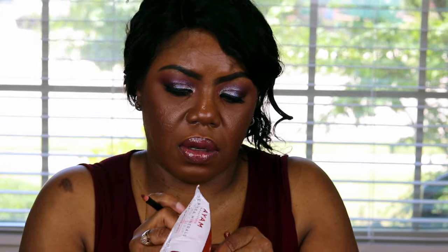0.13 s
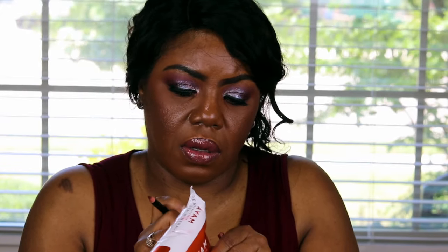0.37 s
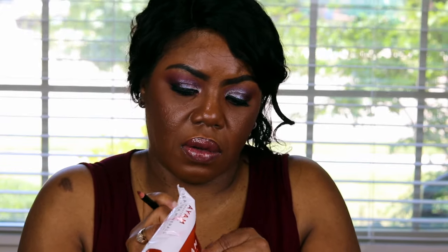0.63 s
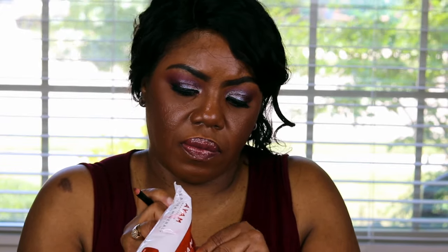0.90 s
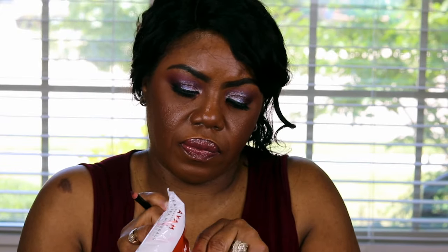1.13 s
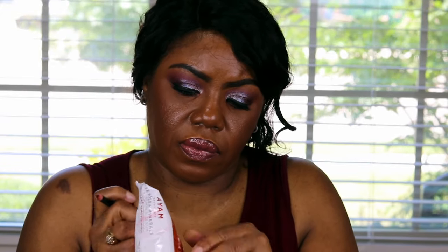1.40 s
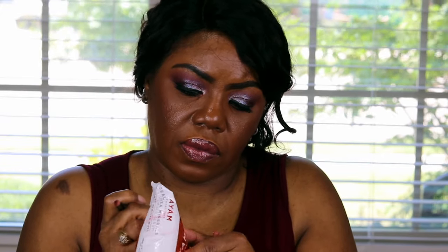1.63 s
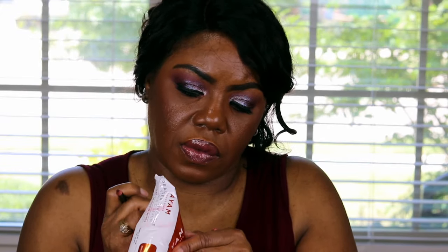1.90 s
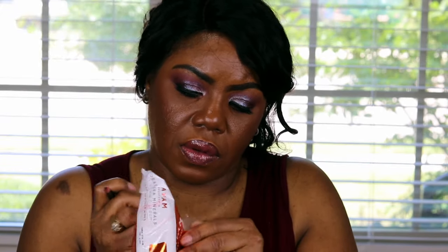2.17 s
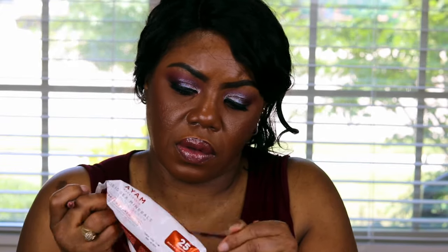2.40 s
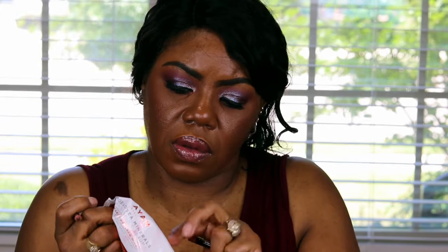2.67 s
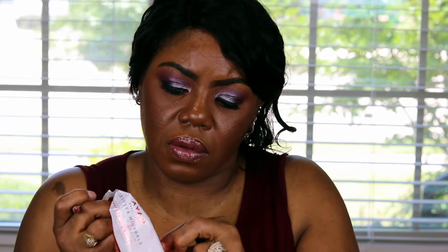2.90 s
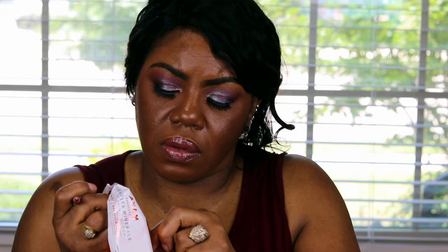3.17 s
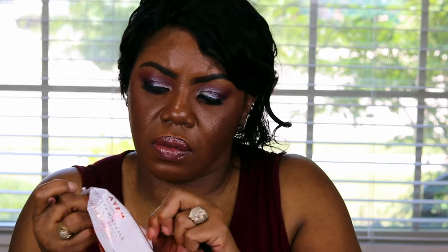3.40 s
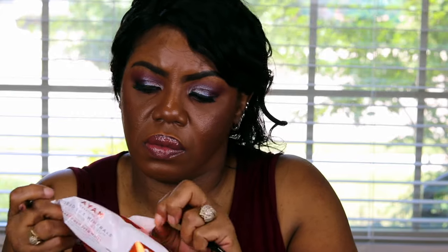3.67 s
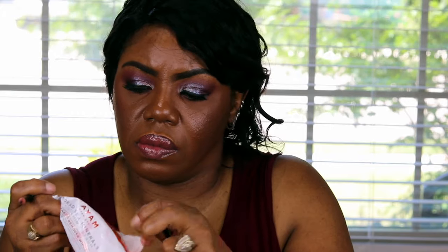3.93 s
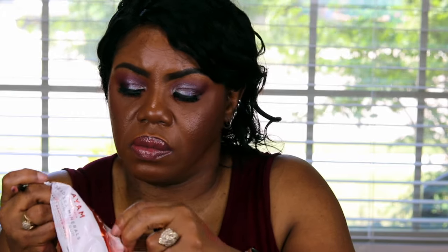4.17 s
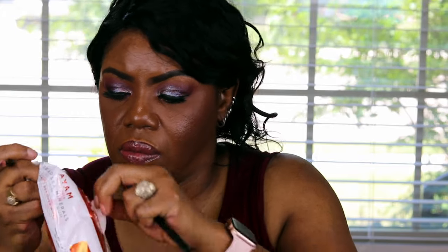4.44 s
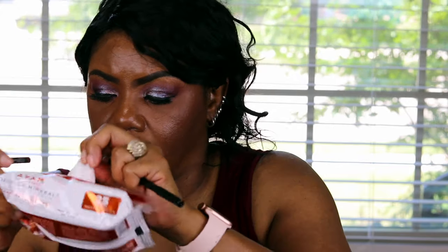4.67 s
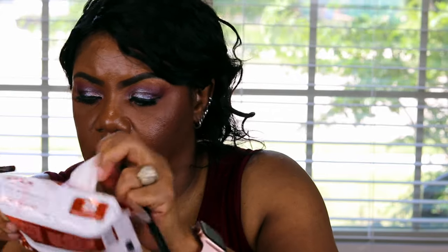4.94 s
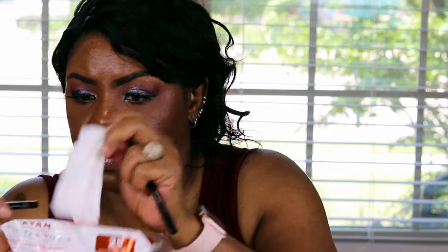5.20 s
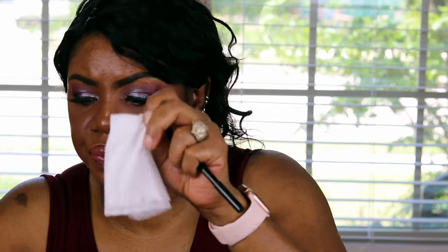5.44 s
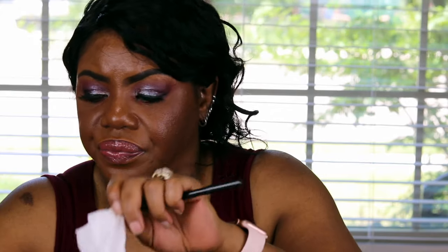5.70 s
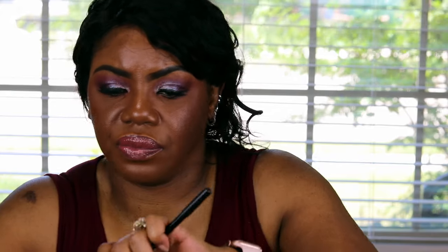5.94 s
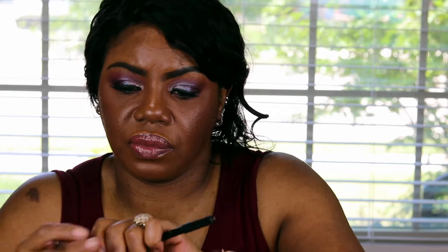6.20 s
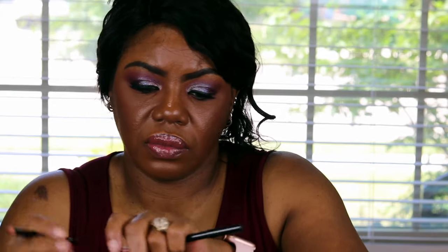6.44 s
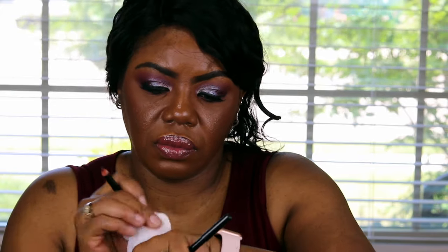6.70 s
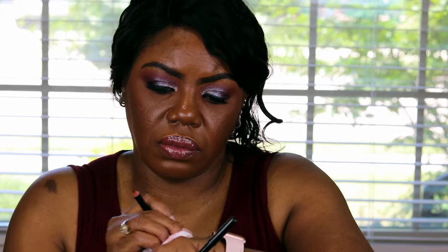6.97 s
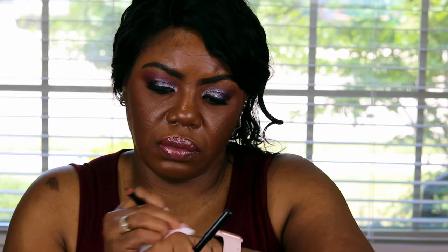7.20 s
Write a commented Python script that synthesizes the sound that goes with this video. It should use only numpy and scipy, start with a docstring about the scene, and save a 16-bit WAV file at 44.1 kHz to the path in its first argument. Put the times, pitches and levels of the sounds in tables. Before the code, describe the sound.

Close stereo microphone in a small furnished room with faint hiss. Fingers crinkle a soft plastic packet in short, bright bursts, building to a loud sharp snap as the seal gives. A quiet pause follows, then scattered crackles and denser rustling as a moist cloth is drawn out. Near the end the packet drops on a hollow table with a low, bouncing thump, and then almost nothing but hiss.

```python
"""Over a soft hiss, fingers crinkle a plastic packet of wipes at a table, peel its seal and draw out a cloth.
Bursts of noise make the rustle; each snap adds a crack and a ringing panel; a short low thud sounds under the
loudest. Near the end the packet drops on the hollow table top and bounces: fading sine waves make the thumps. A
small furnished room answers packet and thumps with stereo tails of fading noise."""
import sys
import numpy as np
from scipy import signal
from scipy.fft import rfft, irfft
from scipy.io import wavfile
from scipy.ndimage import map_coordinates

SR = 44100
rng = np.random.default_rng(int(sys.argv[2]) if len(sys.argv) > 2 else 0)


def file_out(sig):
    """Save sig as 16-bit WAV at sys.argv[1]."""
    # one column per channel
    cols = np.atleast_2d(sig).T
    # limit, then scale
    lim = np.clip(cols, -1, 1)
    pcm = np.round(lim * 32767).astype(np.int16)
    wavfile.write(sys.argv[1], SR, pcm)


N = 323674  # length in samples

# tone colour of the stretched plastic film: (frequency [Hz], relative level [dB])
FILM_COLOUR = [(1500, -26), (3000, -2.5), (5000, 0), (8000, -1), (11000, -5.5), (14000, -15.5),
               (16000, -54.5), (16800, -80)]
# tone colour of the whole pouch, lower than the film: (frequency [Hz], relative level [dB])
POUCH_COLOUR = [(150, -62.5), (400, -27), (900, -3), (1500, 2), (2400, 2), (3400, -3.5), (6000, -20)]


def undb(db):
    """Gain of a level in dB."""
    return 10 ** (np.asarray(db) / 20)


def unit(x):
    """Scales x to rms 1."""
    return x / np.sqrt(np.mean(x ** 2) + 1e-20)


def along(points, hz):
    """Reads (frequency [Hz], value) points at hz, on a log frequency axis."""
    f, v = np.transpose(points)
    return np.interp(np.log(hz + 1), np.log(f + 1), v)


def curves(rows):
    """Turns each column after the time into one value per sample."""
    s, *cols = np.transpose(rows)
    return [np.interp(np.arange(N) / SR, s, c) for c in cols]


def coloured(x, spectrum):
    """Filters x to a (Hz, dB) shape; the filter has unit energy and never answers ahead of time."""
    log_gain = np.log(undb(along(spectrum, np.fft.rfftfreq(4096, 1 / SR))))
    cepstrum = irfft(log_gain)
    # folding the second half onto the first gives the minimum-phase filter
    cepstrum[1:2048] *= 2
    cepstrum[2049:] = 0
    kernel = irfft(np.exp(rfft(cepstrum)))[:2048]
    return signal.fftconvolve(x, kernel / np.linalg.norm(kernel))[:len(x)]


def paired(two, alike):
    """Mixes two unrelated signals into a left-right pair of the given likeness."""
    length = two.shape[1]
    likeness = np.clip(along(alike, np.fft.rfftfreq(length, 1 / SR)), 0, 1)
    turn = np.arccos(likeness) / 2
    mid, side = irfft(rfft(two) * [np.cos(turn), np.sin(turn)], length)
    return np.array([mid + side, mid - side])


def crackle(per_s, spread_db, life_s):
    """Tiny random buckles of very unequal size, each a short fading burst of noise; rms 1."""
    chance, size = rng.random(N), rng.exponential(1, N)
    sparks = (chance < per_s / SR) * undb(spread_db * np.minimum(size, 3))
    burst = np.exp(-np.arange(256) / (life_s * SR))
    envelope = signal.fftconvolve(sparks, burst)[:N]
    return unit(envelope * rng.standard_normal(N))


def gestures(s, held_s, layers_db, rise, sag, release):
    """Gain of each layer: a gesture rises until s, sags while held, lets go (dB a second); powers add."""
    t = np.arange(0, N, 32) / SR
    since = t - s[:, None]
    rising = rise * np.minimum(since, 0)
    sagging = sag * np.maximum(since, 0)
    letting_go = (release - sag) * np.maximum(since - held_s[:, None], 0)
    shape_db = rising - sagging - letting_go
    gains = np.sqrt(undb(layers_db) ** 2 @ undb(shape_db) ** 2)
    return [np.interp(np.arange(N) / SR, t, gain) for gain in gains]


def hiss():
    """Air and circuit noise: a soft steady floor of coloured noise, fuller while the hands are busy."""
    # tone colour of the floor: (frequency [Hz], relative level [dB])
    colour = [(25, -37), (55, -3.5), (85, -14.5), (167, -2), (240, -1.5), (600, -10.5), (1600, -13),
              (2750, -21), (8100, -18), (12900, -24.5), (16000, -35.5), (16800, -78.5)]
    # slow loudness of the floor: (time [s], level [dB])
    loudness = [(0, -62.5), (2.3, -64.5), (3, -65.5), (5.8, -62), (6.5, -67.5), (7.34, -70)]
    # how alike left and right are: (frequency [Hz], likeness [0 to 1])
    alike = [(60, 0.14), (300, 0.45), (1400, .15), (6000, .02)]
    pair = np.array([coloured(rng.standard_normal(N), colour) for channel in range(2)])
    return undb(curves(loudness)[0]) * paired(pair, alike)


def echoes(x, t60s, alike, delay_s, size):
    """Stereo tail of fading noise, size samples long, fading 60 dB in t60; drawn anew every 1024 samples."""
    hop, wet = 1024, np.zeros((2, N + SR))
    for start in range(0, N, hop):
        hz, t, z = signal.stft(rng.standard_normal((2, size)), SR, nperseg=64)
        fade = undb(-60 * t / along(t60s, hz)[:, None])
        tail = signal.istft(z * fade, SR, nperseg=64)[1]
        tail = paired(tail, alike)
        tail = tail / np.linalg.norm(tail[0])
        answer = signal.fftconvolve(x[None, start:start + hop], tail, axes=1)
        wet[:, start + round(delay_s * SR):][:, :answer.shape[1]] += answer
    return wet[:, :N]


def thud():
    """A short low thud, one smooth bell-shaped swell to one side, under the loudest crack."""
    # the single thud: (time [s], level [dB], width [s])
    pulse = (2.3276, -29, 0.00035)
    s, db, width_s = pulse
    return undb(db) * np.exp(-((np.arange(N) / SR - s) / width_s) ** 2)


def table_thumps():
    """Every landing rings the table top's natural tones at new strengths, with a soft start."""
    # the packet lands and bounces: (time [s], relative level [dB])
    blows = [(5.895, 3.5), (5.9056, -15), (5.943, -2.5), (5.968, -14.5), (5.992, -10), (6.039, -6.5),
             (6.111, -3), (6.127, -2), (6.154, -8), (6.19, -15), (6.245, -23.5)]
    # natural tones of the table top: (frequency [Hz], relative level [dB], time to fade 60 dB [s])
    modes = [(111, -33.5, 0.077), (147.3, -12, 0.52), (190, -1, 0.12), (213.4, -5.5, 0.16),
             (284, -2, 0.083), (340, 0.5, 0.022), (365.6, -8, 0.14), (441.7, -8.5, 0.11),
             (540, -7.5, 0.047), (807, -6.5, 0.026)]
    scatter_db = 2.5
    top, t = np.zeros(N + SR), np.arange(SR // 2) / SR
    soft_start = 1 - np.exp(-t / 0.001)
    for s, db in blows:
        ring = np.zeros(len(t))
        for hz, level, t60 in modes:
            fade = undb(level + scatter_db * rng.normal() - 60 * t / t60)
            ring += fade * np.sin(2 * np.pi * hz * t)
        top[round(s * SR):][:len(t)] += undb(db - 13) * ring * soft_start
    return top[:N]


def snaps():
    """Each crease cracks in film and pouch, and the panel that flipped rings for a few cycles; a few low rows
    are knocks of the packet, ringing the same way."""
    # creases that buckle loudly, and three low knocks of the packet (rings below 700 Hz): # (time [s], relative
    # level [dB], ring frequency [Hz], film crack against that level [dB])
    creases = [(0.1156, -17.5, 8600, -8), (0.164, -29.5, 6700, 3.5), (0.3473, -17, 6700, 3),
               (0.4051, -16, 2500, -0.5), (0.427, -21.5, 1880, 5), (0.4987, -12, 2240, -1.5),
               (0.5277, -21, 1660, -19), (0.541, -19.5, 8600, 0), (0.5454, -11, 1670, -22),
               (0.594, -16, 9000, -40), (0.722, -16.5, 8250, -18), (0.8076, -21, 6160, -5),
               (0.9121, -19, 6270, -9), (0.9215, -15, 6900, 4), (1.0807, -31.5, 2440, -33),
               (1.12, -31, 2030, -30), (1.1501, -16, 8250, -20), (1.257, -12, 2390, -19),
               (1.296, -19, 7550, 2), (1.3378, -16.5, 2550, -8), (1.4163, -22.5, 2540, -2),
               (1.4246, -16.5, 6400, -11), (1.481, -17, 2480, 6), (1.652, -20, 7140, -3),
               (1.6619, -18, 9500, 3.5), (1.72, -22, 2680, 0), (1.742, -19.5, 3370, 0.5),
               (1.8139, -20, 7300, 0), (1.825, -15, 2230, 5), (1.9755, -25, 2740, -17),
               (2.039, -17.5, 1170, 5), (2.049, -10.5, 8200, 1), (2.116, -11.5, 1920, -5),
               (2.16, -19.5, 7600, -1.5), (2.201, -16.5, 7100, 1.5), (2.215, -11, 5630, -1),
               (2.2456, -11.5, 1550, -7), (2.3064, -8, 8550, 1), (2.3272, 3, 8900, -4.5),
               (2.348, -6, 7940, 2.5), (2.375, -12.5, 1700, 6.5), (2.4074, -9, 3400, -1.5),
               (2.445, -6, 2550, -0.5), (2.5502, -23, 2150, 11), (2.6205, -27, 2120, -15),
               (2.786, -36.5, 3050, -5), (2.8075, -38, 2660, -3), (2.9798, -32.5, 2260, -16),
               (3.172, -30.5, 1590, -2), (3.445, -40.5, 2440, -12), (3.4812, -27, 6750, -13),
               (3.703, -23, 7060, 7), (3.7324, -17.5, 2430, -22), (3.7497, -13, 8840, -2),
               (3.9722, -23, 3050, 7), (4.0848, -16, 1410, 11), (4.2397, -19.5, 2240, -6.5),
               (4.2412, -19.5, 4770, -3.5), (4.348, -31, 5120, -11), (4.5445, -20.5, 2830, -1.5),
               (4.5663, -17.5, 5200, 1.5), (4.6151, -12, 7400, -5), (4.752, -9, 2280, -7.5),
               (4.773, -19.5, 1790, -10), (4.8223, -9, 2610, 2), (4.973, -18.5, 1650, 9.5),
               (5.053, -19, 2320, -38), (5.0843, -18.5, 1470, -17.5), (5.1665, -2, 8950, 0.5),
               (5.172, -22, 434, -29), (5.232, -7, 2270, 1), (5.243, -4, 7400, -8.5),
               (5.2935, -4.5, 6140, -3), (5.294, -27, 396, -31), (5.361, -9.5, 5500, 6),
               (5.384, -8.5, 2480, 7), (5.427, -19, 625, -27), (5.445, -11.5, 2190, 6),
               (5.657, -6.5, 9800, -2.5), (5.861, -18, 1100, -6), (5.9742, -15, 10000, -3),
               (6.1066, -6, 8870, -3), (6.4663, -43.5, 1930, -5), (6.9834, -50, 3640, -25),
               (7.004, -51, 1604, -31.5)]
    film, pouch, panel = np.zeros((3, N + 1024))
    t = np.arange(1024) / SR
    for s, db, hz, film_db in creases:
        at = slice(round(s * SR), round(s * SR) + 1024)
        crack = rng.standard_normal(1024) * undb(-60 * t / 0.0045)
        crack /= np.abs(crack).max()
        # the ring swells over one to three cycles, then fades
        swing = t / (0.0008 * (hz / 2400) ** -0.75)
        swell = (swing * np.exp(1 - swing)) ** 2.0
        turn = 2 * np.pi * hz * t
        overtone = 0.15 * (hz < SR / 12)  # large, low panels also ring in halves
        film[at] += undb(db + film_db) * crack
        pouch[at] += undb(db - 10.5) * crack
        panel[at] += undb(db - 4.0) * swell * (np.sin(turn) + overtone * np.sin(2.1 * turn))
    # a panel is too small to radiate bass
    no_bass = signal.butter(N=2, Wn=260, btype="high", fs=SR, output="sos")
    panel = signal.sosfilt(no_bass, panel)
    return (coloured(film, FILM_COLOUR) + coloured(pouch, POUCH_COLOUR) + panel)[:N]


def handling():
    """The stretched film crackles bright, the pouch rustles lower, the wet filling sighs when squashed."""
    # moves of the fingers: (time of full strength [s], held [s], film crackle [dB],
    # pouch rustle against the film [dB], sheen of taut film against the film [dB])
    moves = [(0.0, 0.0068, -42, 12.5, 9.5), (0.13, 0.24, -50, -5.5, -2), (0.344, 0.084, -35, -7.5, -9),
             (0.506, 0.076, -53, 10.5, -3), (0.616, 0.03, -36.5, -2, 7.5), (0.626, 0.061, -28, -1.5, -1),
             (0.82, 0.043, -33, -32.5, 4.5), (0.925, 0.014, -43, -3.5, 10), (1.15, 0.026, -63.5, -4, 23.5),
             (1.262, 0.025, -45, 3, 6), (1.421, 0.016, -48, 3, -14), (1.481, 0.049, -32, 0, 0),
             (1.598, 0.032, -46.5, -4, 6.5), (1.665, 0.054, -45.5, -5, 11), (1.819, 0.058, -31.5, -9, -1.5),
             (2.004, 0.046, -37.5, -6.5, 6.5), (2.037, 0.018, -37, 3.5, 5), (2.129, 0.056, -49.5, 11.5, -9),
             (2.165, 0.024, -47, 9, 2.5), (2.195, 0.12, -31, 0.5, 2.5), (2.314, 0.13, -27, 1, 7.5),
             (2.399, 0.077, -27, 3, 5), (2.458, 0.093, -31.5, 1.5, 1), (2.62, 0.063, -52.5, 3, 0),
             (2.949, 0.0136, -60.5, -2, 10), (3.198, 0.0067, -40.5, -2, 0.5), (3.479, 0.022, -51, -7, -1),
             (3.552, 0.104, -32, 0, 4.5), (3.705, 0.0346, -36, -20, 1), (3.764, 0.03, -34.5, 5.5, 7),
             (3.99, 0.052, -51.5, 12, 7), (4.046, 0.05, -33.5, -1, 5), (4.089, 0.062, -34, 0, 5.5),
             (4.562, 0.066, -45, -3, -11), (4.597, 0.039, -33.5, 2.5, 10), (4.641, 0.1, -29, -9.5, 4),
             (4.707, 0.037, -35.5, 4, -6), (4.773, 0.086, -35, 7.5, 7.5), (4.856, 0.06, -31.5, -3.5, 3.5),
             (4.978, 0.0074, -38, 2.5, 13), (5.061, 0.029, -39.5, -5, 0), (5.128, 0.044, -38.5, 3, 10),
             (5.159, 0.049, -30.5, 0.5, 12.5), (5.253, 0.065, -33.5, -2, 11.5),
             (5.329, 0.052, -30.5, -4, -0.5), (5.378, 0.1, -24, -3, 2), (5.491, 0.061, -32, -2, 2),
             (5.546, 0.053, -30.5, -5, 3), (5.649, 0.0069, -30.5, -6.5, 8.5), (5.872, 0.027, -35, -0.5, 2),
             (5.916, 0.11, -29, 1, 6.5), (5.97, 0.077, -29.5, -4.5, 6.5), (6.017, 0.04, -27, 1, 6),
             (6.106, 0.049, -26.5, -2.5, 6), (6.478, 0.027, -74, 9.5, -10), (6.822, 0.018, -72.5, 1.5, 1)]
    # squeezes of the filling: (time of full strength [s], held [s], level [dB])
    squeezes = [(0.64, 0.14, -52), (1.49, .1, -56.5), (2.042, 0.033, -43.5), (2.201, 0.09, -55.5),
                (2.347, 0.039, -37.5), (2.4, 0.044, -32.5), (2.45, 0.066, -29.5), (3.6, 0.17, -56),
                (4.05, 0.16, -54), (4.6, 0.11, -54), (4.751, 0.32, -48.5), (5.16, .06, -42),
                (5.298, 0.23, -42.5), (5.881, 0.036, -33.5), (5.91, .06, -27.5), (6.119, 0.054, -40)]
    # the packet is never quite still in the hands: (time [s], film level [dB])
    fidget = [(0, -68), (1.2, -64), (2.6, -63), (3.1, -75), (4.4, -73.5), (5.8, -67), (6.25, -66),
              (6.45, -85)]
    # tone colour of the wet filling: (frequency [Hz], relative level [dB])
    filling_colour = [(110, -42.5), (230, -6.5), (450, 2.5), (950, 0.5), (1500, -26)]

    s, held_s, db, pouch_db, sheen_db = np.transpose(moves)
    layers_db = [db, db + pouch_db, db + sheen_db]
    moved = gestures(s, held_s, layers_db, rise=797, sag=98, release=446)
    s, held_s, db = np.transpose(squeezes)
    squeezed = gestures(s, held_s, [db], rise=603, sag=89, release=399.5)
    idle_db = [[0], [3.5], [-3.5], [0.5]]  # film, pouch, sheen, filling against the film
    idle = undb(curves(fidget)[0] + idle_db)
    gains = np.hypot(moved + squeezed, idle)  # the lists join into four layers

    # one buckle shakes film and pouch alike
    shared = crackle(750, spread_db=5.5, life_s=0.0005)
    film = coloured(shared, FILM_COLOUR)
    below_sheen = signal.butter(N=3, Wn=7800, fs=SR, output="sos")
    slack = signal.sosfiltfilt(below_sheen, film)
    sheen = film - slack  # tension brings out the top octave
    own = crackle(900, spread_db=1.5, life_s=0.00084)
    pouch = coloured(0.65 * shared + 0.77 * own, POUCH_COLOUR)
    filling = coloured(crackle(900, spread_db=1.5, life_s=0.0014), filling_colour)
    return np.sum(gains * [slack, pouch, sheen, filling], axis=0)


def scene():
    """Packet and table: direct, scattered by hands and table top within milliseconds, and from the walls."""
    # the packet drifts to the left: (time [s], delay of the right channel [microseconds])
    drift = [(0, 17), (3.3, 17.4), (4.2, 32), (5.7, 63), (7.34, 20)]
    # left-right likeness of the near scatter: (frequency [Hz], likeness [0 to 1])
    near_alike = [(300, 1), (1000, 0.16), (3000, 0.13), (10000, 0.072)]
    # how long the room rings: (frequency [Hz], time to fade 60 dB [s])
    room_t60 = [(120, 0.22), (500, 0.22), (2000, 0.22), (8000, 0.18), (15000, 0.05)]
    # left-right likeness of the room: (frequency [Hz], likeness [0 to 1])
    room_alike = [(100, 0.93), (400, 0.95), (1000, 0.3), (2500, 0.14)]

    rustle, cracks, thumps = handling(), snaps(), table_thumps()
    packet = rustle + undb(-5) * cracks
    # a crease beams its crack forward, past hands and walls
    direct = rustle + undb(2.5) * cracks
    late = map_coordinates(direct, [np.arange(N) - curves(drift)[0] * SR / 10 ** 6])
    scatter = echoes(packet, [(1000, 0.031)], near_alike, delay_s=0, size=512)
    near = undb(-6.0) * np.array([direct, late]) + undb(-1.5) * scatter
    into_room = undb(-2.5) * packet + undb(-7.5) * thumps
    walls = echoes(into_room, room_t60, room_alike, delay_s=0.007, size=12288)
    balance = undb([[0.2], [-0.2]])  # left a touch louder
    return (near + walls) * balance + thumps


def low_pass(x):
    """Removes everything above the highest recorded frequency."""
    return signal.sosfilt(signal.butter(12, 16850, fs=SR, output="sos"), x)


def record(dry):
    """The microphone's low cut and treble limit shape the scene; the hiss and the thud join after them."""
    low_cut = signal.butter(N=6, Wn=90, btype="high", fs=SR, output="sos")
    treble_limit = signal.butter(N=10, Wn=15300, fs=SR, output="sos")
    heard = signal.sosfilt(np.vstack([low_cut, treble_limit]), dry)
    mix = heard + hiss() + thud()
    return low_pass(mix)


dry = scene()
out = record(dry)
file_out(out)
```